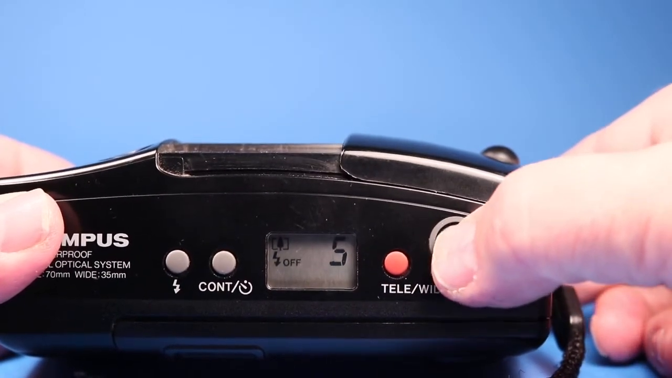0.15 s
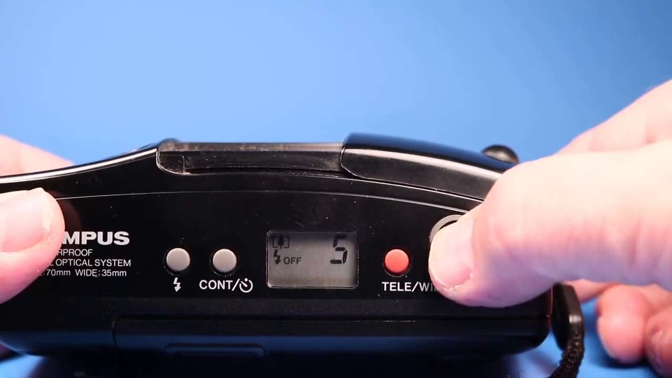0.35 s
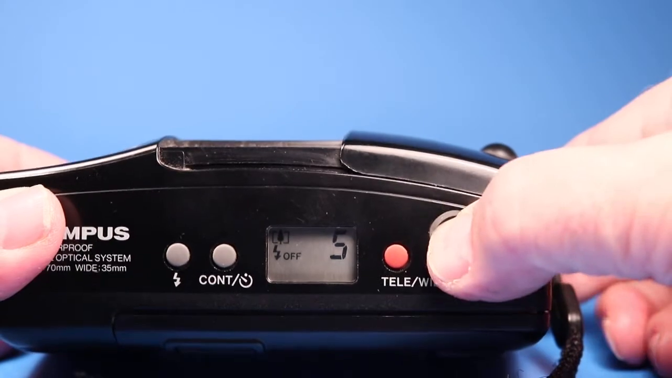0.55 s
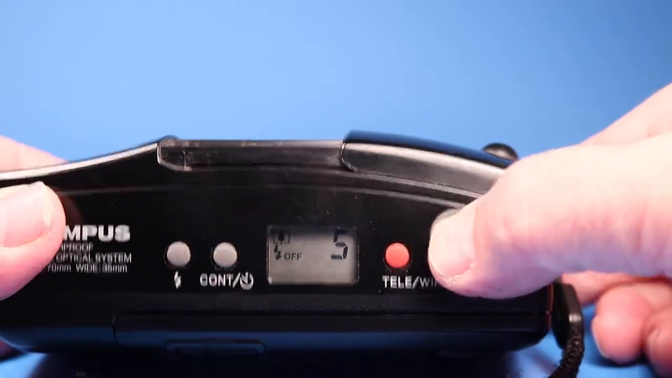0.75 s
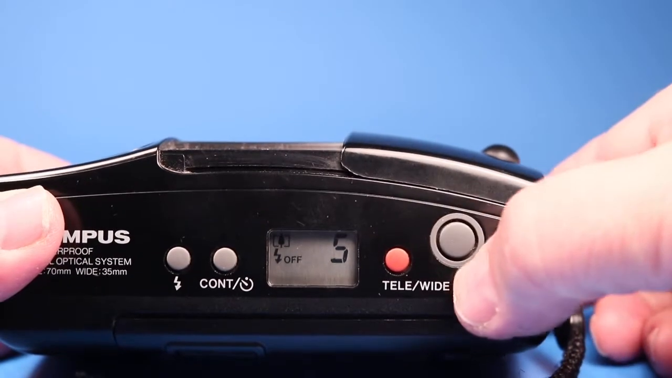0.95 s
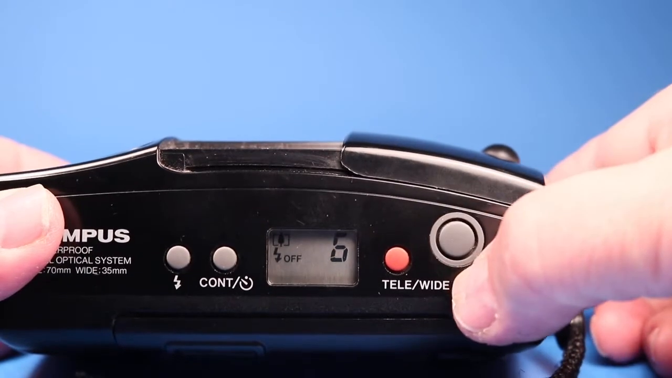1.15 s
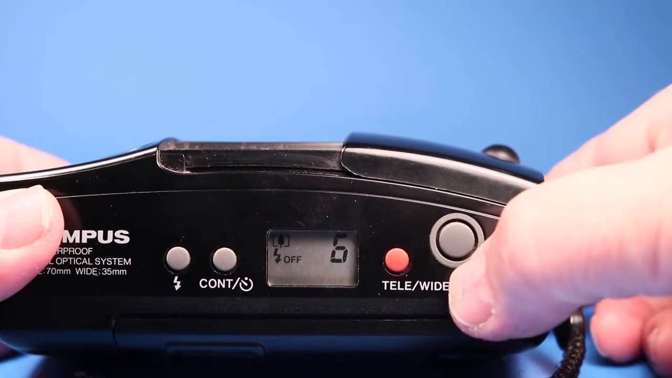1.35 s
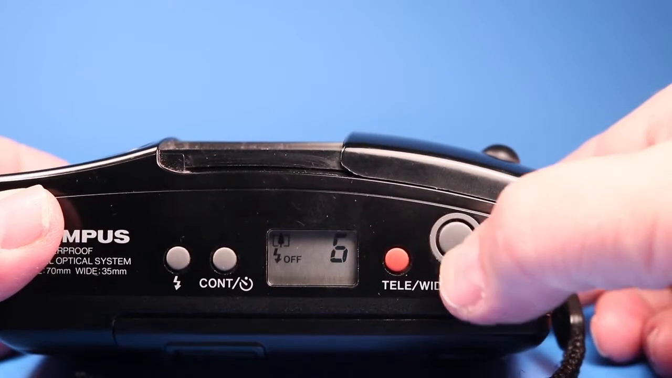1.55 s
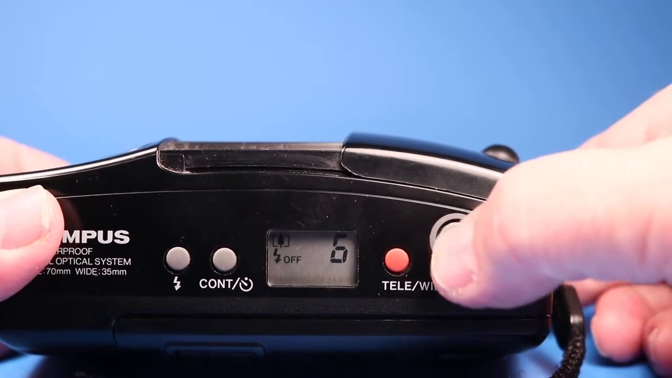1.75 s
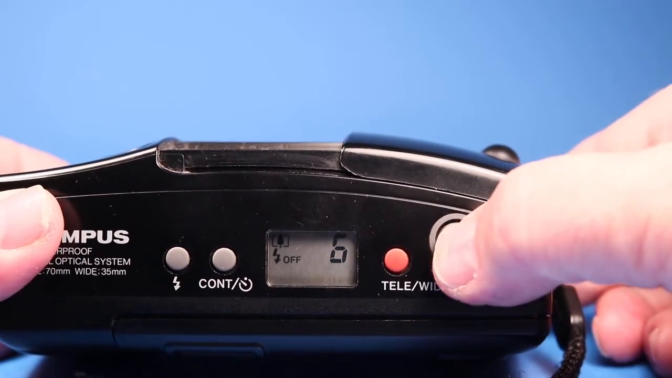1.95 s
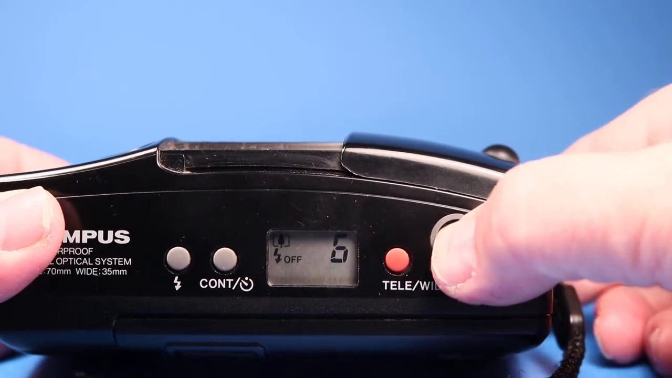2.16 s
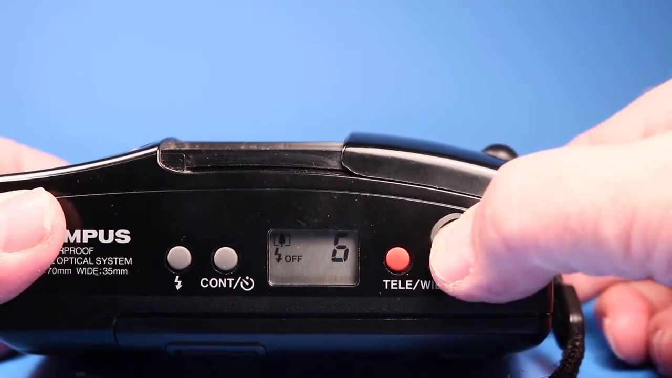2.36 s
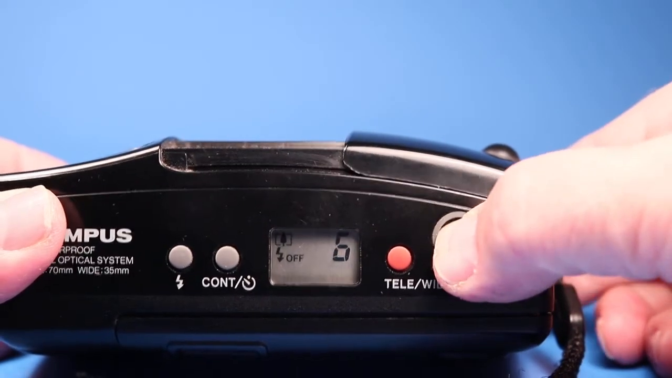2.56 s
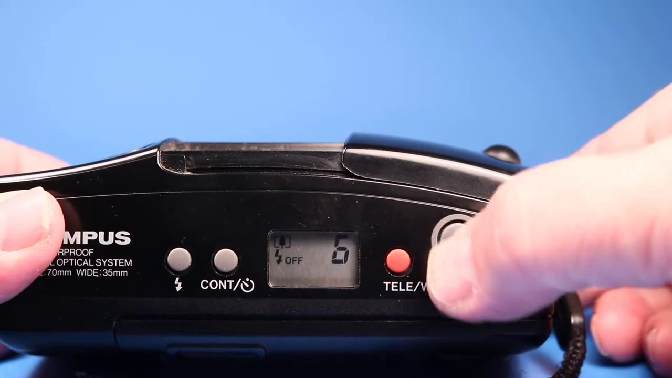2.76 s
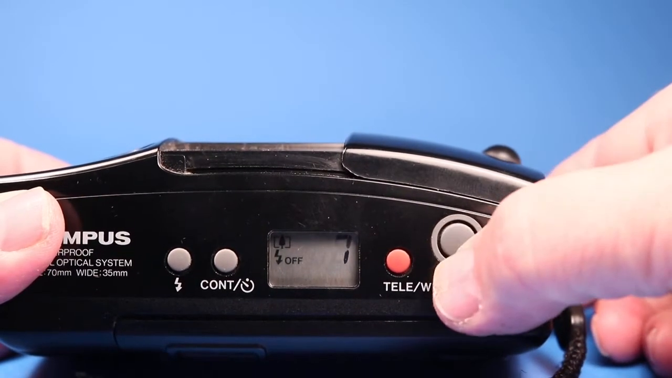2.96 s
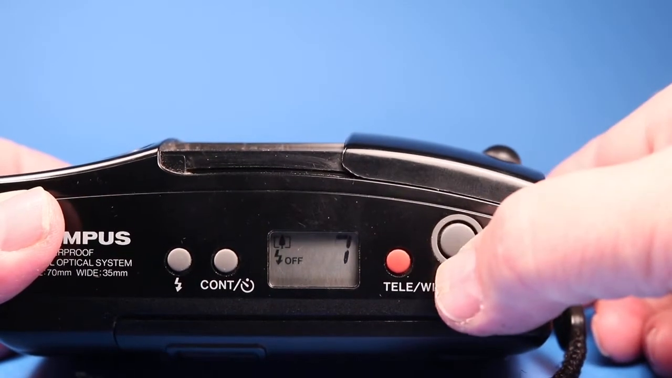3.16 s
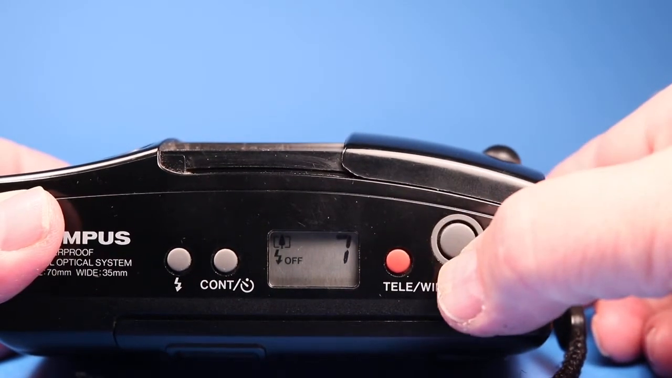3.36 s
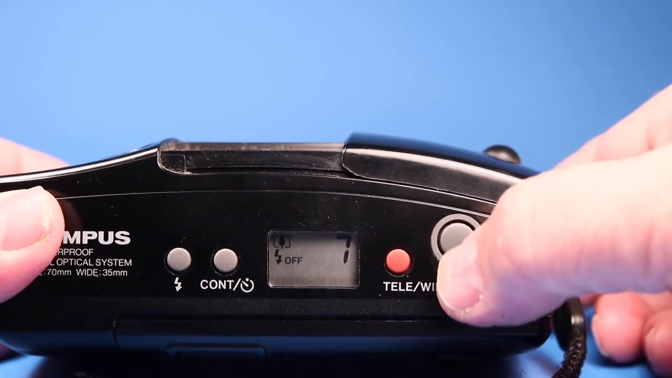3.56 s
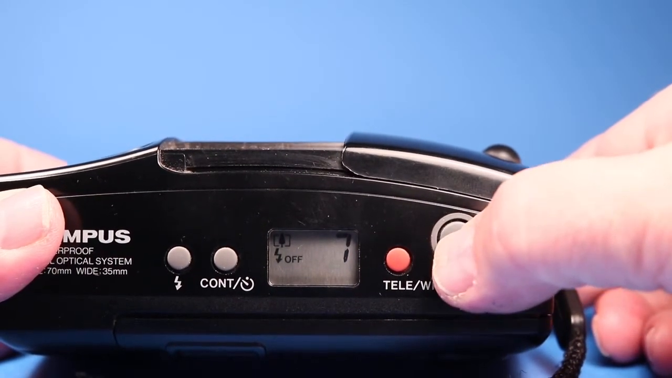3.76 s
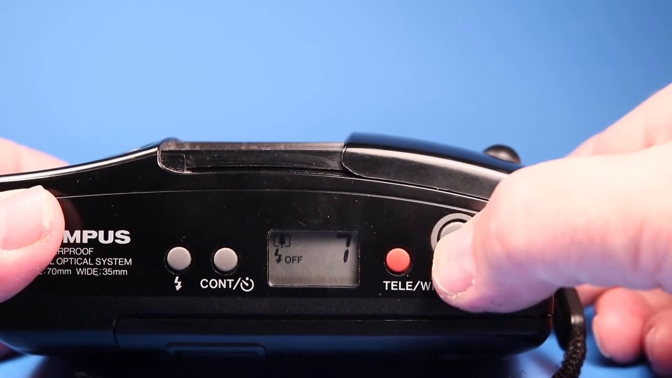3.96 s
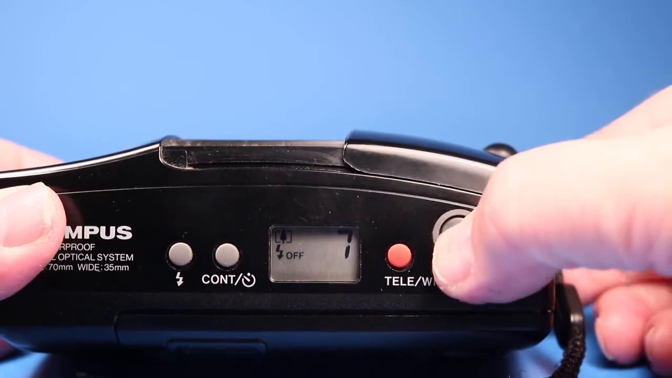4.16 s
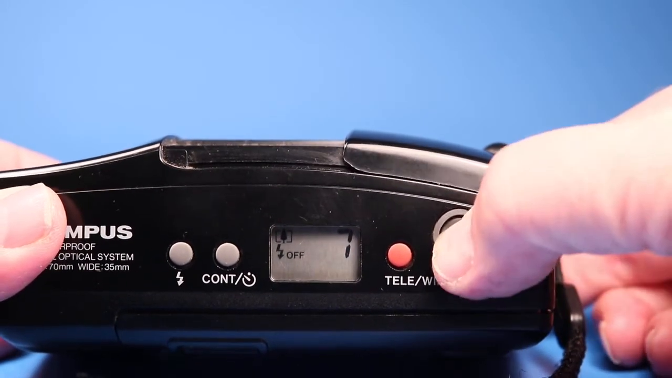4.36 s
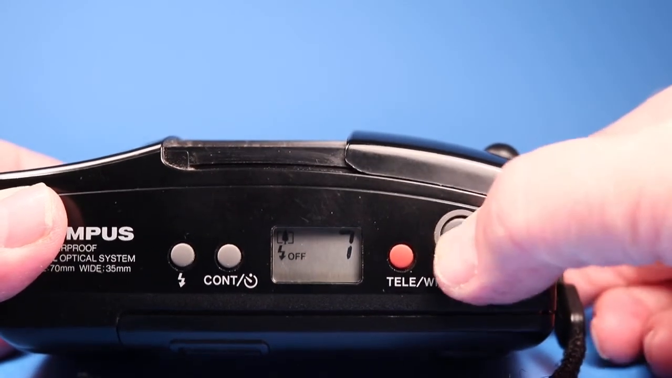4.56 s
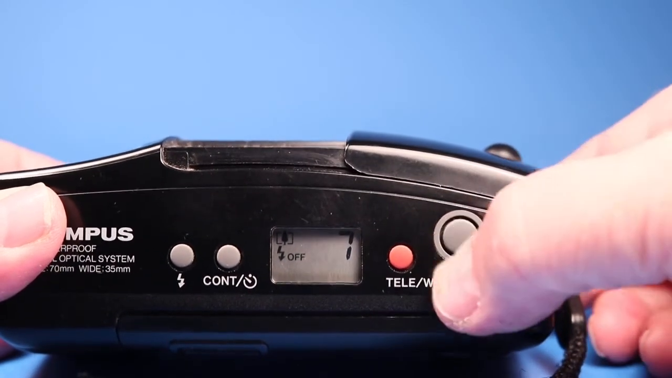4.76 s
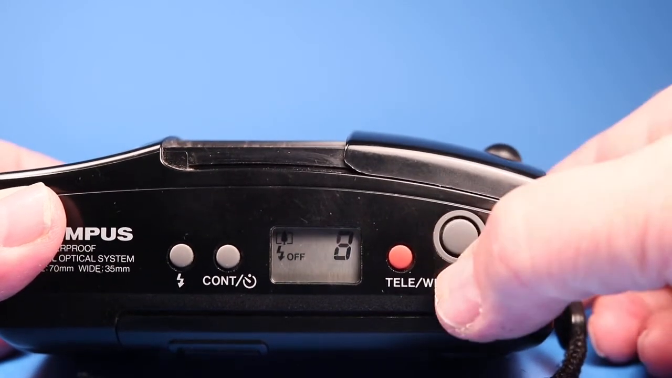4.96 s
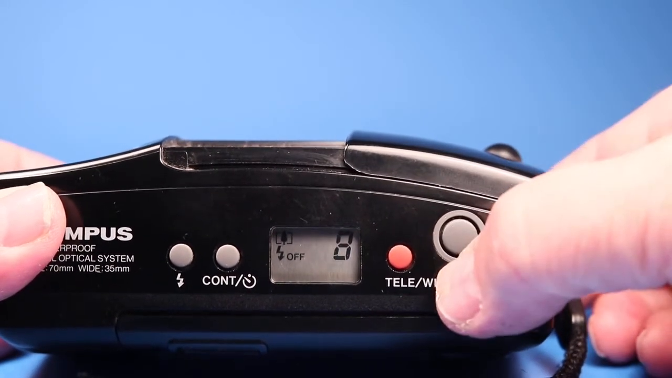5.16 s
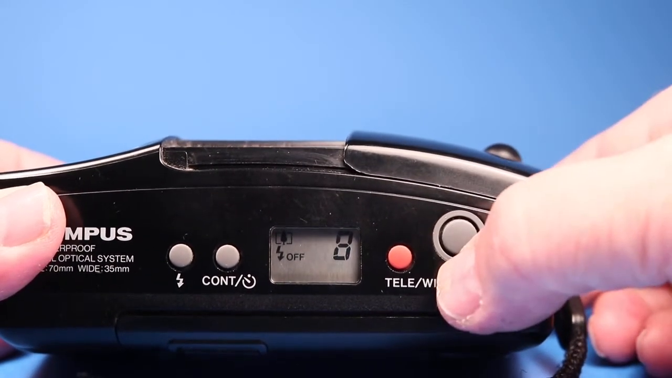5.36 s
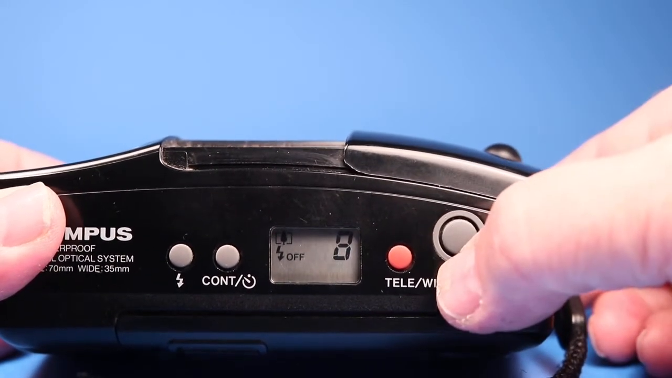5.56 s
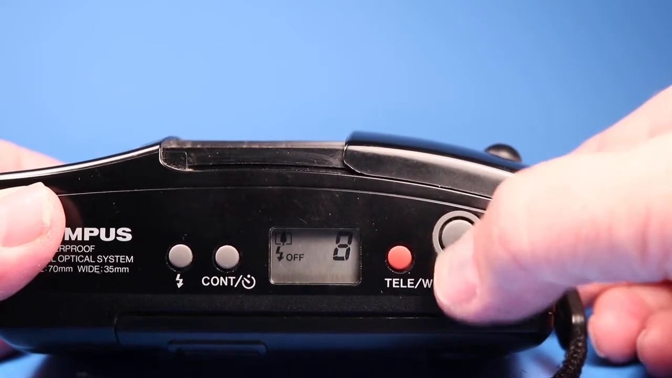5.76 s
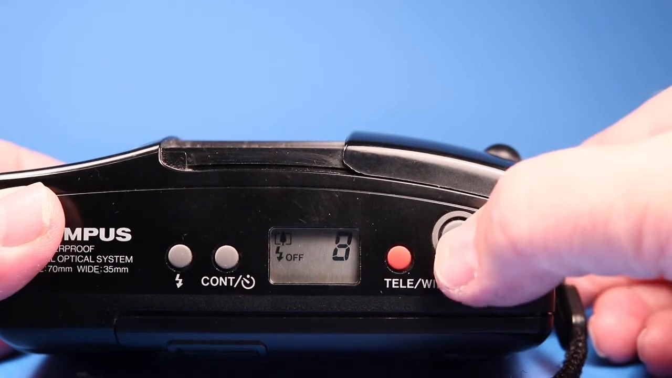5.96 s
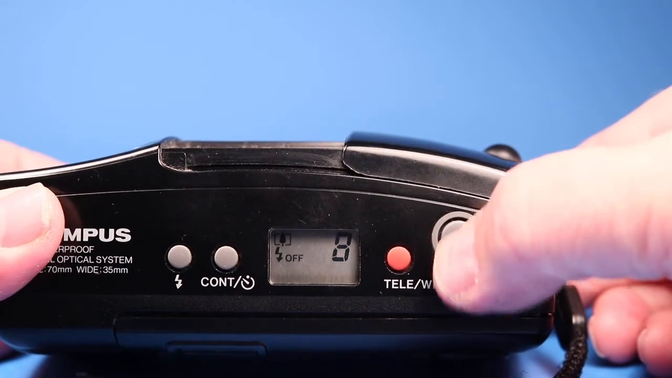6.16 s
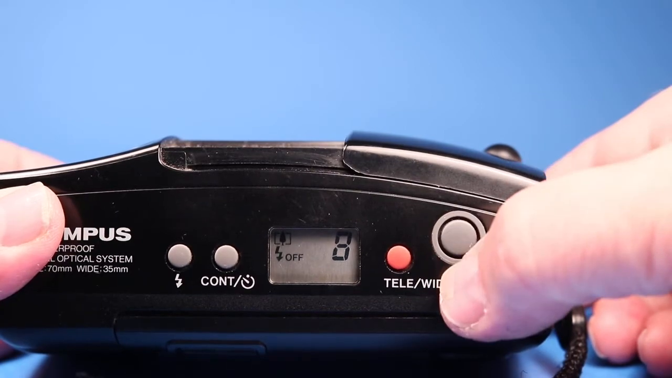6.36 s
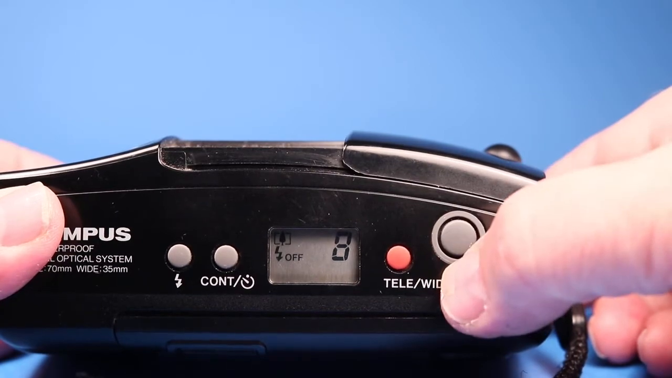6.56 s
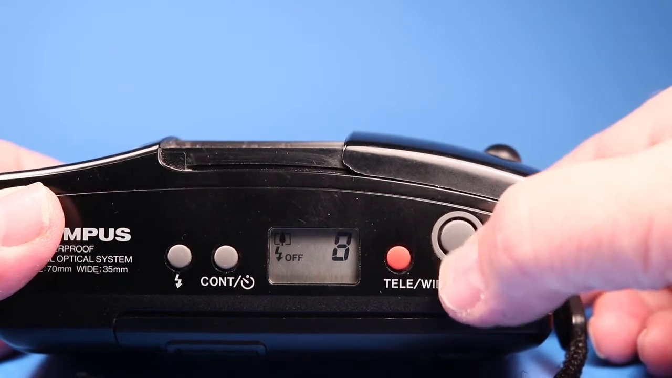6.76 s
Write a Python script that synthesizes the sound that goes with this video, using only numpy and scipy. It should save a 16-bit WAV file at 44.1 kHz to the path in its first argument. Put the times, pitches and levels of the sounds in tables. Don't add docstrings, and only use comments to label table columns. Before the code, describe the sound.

A compact film camera takes three pictures up close: rattly lens motor, hard shutter snap, then a higher whirring film wind, with quiet between.

```python
import sys
import numpy as np
from scipy import signal
from scipy.fft import rfft, irfft, next_fast_len
from scipy.io import wavfile

SR = 44100
rng = np.random.default_rng(int(sys.argv[2]) if len(sys.argv) > 2 else 0)


def invert_db(x):
    u = np.asarray(x, float) / 20
    return 10 ** u


def generate_wav(signal):
    frames = np.transpose(np.atleast_2d(signal))
    scaled = np.clip(frames, -1, 1) * 32767
    pcm = np.round(scaled).astype(np.int16)
    wavfile.write(sys.argv[1], SR, pcm)


N = 304157
TIME = np.arange(N) / SR
SIZE = next_fast_len(N + SR // 2)
BINS = np.maximum(np.arange(SIZE // 2 + 1) * SR / SIZE, 1)

LATCH_S = [
    1.158,
    2.978,
    4.968,
]
# start_s, peak_db
CONTACTS = [
    [(.6851, -6), (.7146, -6), (.7484, -13), (.8142, -5.5), (.8429, -5), (.8693, -10), (.9166, -6.5),
     (1.02, -6.5), (1.049, -18), (1.1233, -5), (1.1582, 2.5), (1.3681, -2), (1.5785, -3.5), (1.6434, -8)],
    [(2.498, -6), (2.5299, -7), (2.5694, -9), (2.6262, -7), (2.6579, -3), (2.6856, -10), (2.729, -7.5),
     (2.8358, -6.5), (2.8625, -6), (2.9365, -4), (2.9771, 5), (3.1826, -3.5), (3.4387, -4.5),
     (3.5032, -4.5)],
    [(4.4875, -6.5), (4.5194, -6), (4.5509, -5.5), (4.6163, -6), (4.6472, -4), (4.676, -13), (4.72, -6),
     (4.8276, -10), (4.8582, -6.5), (4.932, -5), (4.9684, 4.5), (5.171, -5.5), (5.43, -5.5), (5.4893, -17)],
]
# brightness_rel_db, thud_db, length_ms, left_minus_right_db
LEVERS = [(-14.5, -53, 5.7, -7), (-11, -58, 3.4, -9.5), (-21, -45, 3.1, -2), (-8.5, -35, 3.9, -7),
          (-15.5, -47, 2.76, -9), (-10.5, -54, 3.1, -4), (-7, -38.5, 6.5, -8), (-14.5, -54, 5, -9),
          (-19, -54, 2.7, -3.5), (-17, -28, 3.8, -8), (-11, -19.5, 7.1, -2), (-4.5, -47.5, 2.7, -9.5),
          (-9, -43, 3.6, -7.5), (-15.5, -42, 2.3, -9.5)]
# start_s, peak_db, brightness_rel_db, length_ms, left_minus_right_db
BUTTON = [
    (.2986, -42, 3, .7, -1.5),
    (2.1404, -45, 3, .7, -1),
    (4.1377, -35, -24, 1.4, -5),
    (4.1527, -36, 8, .6, -2),
    (4.163, -50, 3, 4, -2),
    (5.6016, -40, -22, 1.4, -1.5),
]
# freq_hz, width_hz, level_db
LEVER_RING = [(3000, 440, 5.5), (6340, 1800, 6.5)]

# time_s, shaft_hz, film_load_db
WIND = [
    [(1.19, 241.4, -27), (1.204, 247.7, -23), (1.27, 299.1, 0), (1.354, 319.2, -7), (1.426, 324.2, 2.5),
     (1.564, 331.7, -4), (1.59, 329.4, 0.5)],
    [(3.005, 200, -4), (3.05, 267.8, -5), (3.08, 288, -2), (3.136, 314.8, -6.5), (3.35, 330.4, 2),
     (3.434, 331.2, 1.5), (3.45, 334, -10)],
    [(4.995, 189.9, 1), (5.04, 257.4, -1), (5.082, 295.5, -3), (5.198, 317.3, -0.5), (5.326, 286.5, 8),
     (5.39, 259.8, 12.5), (5.44, 230.4, 6)],
]
# shaft_multiple, rel_db
HUM_ORDERS = [(2, -0.25), (3, -1)]
COMMUTATOR_ORDERS = [(4.55, -9.5), (5.3, -5)]
PINION_ORDERS = [(9, -3.5), (11, -9.5), (12.8, -12), (30, -12.5)]
FULL_SPEED_HZ, HUM_DB, HUM_DB_PER_HZ, HUM_LEAST_DB = 330, -37.5, .3, -56
TAKE_UP_S, SLACK_DB = .09, 26
COMMUTATOR_DB, COMMUTATOR_KNEE_HZ, COMMUTATOR_DB_PER_HZ = -27, 300, .4
PINION_DB, OCTAVE_DB, OCTAVE_LOAD_SHARE, OCTAVE_DB_PER_HZ = -30, -28.5, .25, .09
BOOM_LO_HZ, BOOM_HI_HZ, BOOM_TOP_DB, BOOM_LO_DB_PER_HZ, BOOM_HI_DB_PER_HZ = 630, 860, -38.5, .09, .04

# start_s, trip_s, end_s, tooth_load_db
LENS_RUNS = [
    (-.60, -.478, -.35, -0.11),
    (-.345, -.14, .019, -1.5),
]
# shaft_multiple, rel_db
LENS_ORDERS = [(30, -1), (40, 5.5), (50, -3)]
BRAKED_HZ, CRUISE_HZ, CREEP_HZ, SURGE_HZ = 102.6, 127.8, 3, 141.2
SPIN_UP_S, SURGE_S, BRAKE_S = .055, .024, .072
LENS_HUM_DB, LENS_TOOTH_DB, LENS_FREE_DB, LENS_BRAKED_DB = -48, -30.5, -62, -41
TOOTH_KNEE_HZ, TOOTH_DB_PER_HZ, TOOTH_SWELL_DB = 119, 1.2, 3.2

# time_from_latch_s, level_db
TRAIN = [(-0.608, -63), (-0.591, -35), (-0.57, -27), (-0.48, -24), (-0.26, -22.5), (-.10, -23),
         (0.0077, -19.5), (.12, -20.5), (.24, -18.5)]
# stop_s, last_effort_db
STOPS = [
    (1.655, -20.5),
    (3.515, -20.5),
    (5.494, -24.5),
]
EASE_S, EASE_DB, RUN_DOWN_S, RUN_DOWN_DB = 0.032, 1, 0.066, 31
# start_s, length_s, boom_db, buzz_db
DRIVE = [(0.753, .075, -34, -37.5), (1.068, 0.14, -32.5, -40), (1.601, 0.052, -40, -45),
         (2.56, 0.076, -32.5, -35.5), (2.893, 0.13, -29.5, -33), (3.461, .06, -39, -42.5),
         (4.542, 0.08, -34, -38.5), (4.884, 0.14, -32, -38), (5.437, 0.036, -40.5, -54)]
DRIVE_ATTACK_S, DRIVE_RELEASE_S = .012, .02
TICKS_PER_S, TICK_SPREAD_DB, SHAFT_THROB = 8000, 2.4, .3
EFFORT_REF_DB = -22
BOOM_DB, BOOM_FOLLOWS, FIZZ_DB, FIZZ_FOLLOWS = -39, 0.6, -34.5, 0.89
SPRING_HZ, SPRING_T60_S, SPRING_DB, SPRING_HELD_S = 2565, .75, -70, 4.2
# freq_hz, level_db_per_hz
SHELL = [(210, -47.5), (350, -6.5), (404, -26.5), (655, -9), (903, -14.5), (1530, -3.5), (2080, -5),
         (2610, -4.5), (5280, -17.5), (6300, -9.5), (6940, -14), (8550, -11), (13800, -25), (16200, -19)]
# freq_hz, width_hz, level_db
SHELL_PEAKS = [(670, 110, 4), (1330, 120, 2), (1580, 350, 2), (2580, 140, 3), (2880, 160, 2),
               (4150, 600, 6), (7660, 300, 2), (8600, 300, 2)]
# freq_hz, left_right_likeness
RATTLE_ALIKE = [(300, 1), (900, 1), (1500, 0.88), (3000, 0.48), (7000, 0.049), (15000, 0.099)]

# start_s, peak_db
THUNKS = [(0.749, -14.5), (1.08, -20), (1.157, -15.5), (1.644, -38), (2.565, -16.5), (2.901, -20.5),
          (2.977, -15.5), (3.502, -26), (4.552, -17.5), (4.884, -25), (4.967, -15.5), (5.489, -33)]
# start_s, peak_db, freq_hz
HANDS = [
    (0.11, -45, 114),
    (0.409, -44, 110),
    (2.202, -42, 137),
    (4.178, -42.5, 124),
]
RUB_START_S, RUB_LENGTH_S, RUB_DB, RUB_HZ = 5.70, .11, -57, 1400

# freq_hz, left_minus_right_db
SIDES = [(100, 2.5), (300, -3.4), (1300, 0.8), (2400, -7.5), (4400, -2.5), (8000, -1.7), (15000, 2.5)]
TABLE_T60_S, TABLE_DB = .004, -8
ROOM_T60_S, ROOM_DB = .2, -15
# freq_hz, level_db_per_hz
AIR = [(12, -64), (20, -24), (53, -8.5), (150, -8.5), (270, -8), (350, -7), (450, -12.5), (700, -13.5),
       (1300, -17), (2500, -21), (8000, -27), (12000, -31), (15500, -35), (17000, -43.5)]
# freq_hz, width_hz, level_db
AIR_HUM = [(59, 4.1, 9.5), (119, 7.4, 4.5), (245, 5.1, 11)]
# freq_hz, left_right_likeness
AIR_ALIKE = [(60, 0.53), (240, 0.63), (950, 0.11), (3770, 0.21), (15000, 0.037)]
AIR_DB = -57

LIMIT_DB, RELEASE_DB_PER_S, ATTACK_S = -6, 139.5, 0.0094


def clicks():
    span_s = np.arange(int(.03 * SR)) / SR
    rows = contact_rows()
    length_ms = np.maximum(rows[:, 4:5], .3)
    fades = np.minimum(span_s / .0009, 1) * np.exp(-(span_s * 1000 / length_ms) ** 3)
    impulse = 1.0 * (np.arange(N) == 0)
    ring = causal(shell(impulse), humps(LEVER_RING))[None, :len(span_s)]
    ring = ring * invert_db(-60 * span_s / 0.022)
    contacts = rng.standard_normal(fades.shape) * fades
    struck = signal.fftconvolve(contacts, ring, axes=1)[:, :len(span_s)]
    mids = band(struck, 2, 950, 5000)
    highs = band(struck, 2, 4200, 12500)
    out, thud = np.zeros((2, 2, N))
    for (start_s, peak_db, bright_db, thud_db, _, pan_db), mid, high in zip(rows, mids, highs):
        at = round(start_s * SR)
        sides = invert_db([[pan_db / 2 + 2.5], [-pan_db / 2 - 2.5]])
        flurry = mid / np.abs(mid).max() + invert_db(bright_db + 8.0) * high / np.abs(high).max()
        out[:, at:at + len(span_s)] += invert_db(peak_db - 0.3) * flurry * sides
        thud[:, at] += invert_db(thud_db - 1.0)
    return out + knock(thud, 195, .16) + invert_db(-4.5) * knock(thud, 150, 0.16)


def contact_rows():
    levers = [hit + lever for cycle in CONTACTS for hit, lever in zip(cycle, LEVERS)]
    button = [(s, db, bright_db, -99, ms, pan_db) for s, db, bright_db, ms, pan_db in BUTTON]
    return np.array(levers + button)


def winding_motor():
    gate, hz, load_db = in_time(WIND)
    turns = np.cumsum(hz) / SR
    lag_hz = FULL_SPEED_HZ - hz
    taken_up = sum(held(run[0][0], 1, TAKE_UP_S, .1) for run in WIND)
    slack_db = SLACK_DB * (1 - taken_up)

    hum_db = np.maximum(HUM_DB - HUM_DB_PER_HZ * lag_hz, HUM_LEAST_DB)
    hum = whine(turns, 1, hum_db, flutter_db=.7, blur=.1)
    for k, db in HUM_ORDERS:
        hum += whine(turns, k, booming(k * hz) + db, flutter_db=.7 * k, blur=.1 * k)

    below_knee_hz = np.maximum(COMMUTATOR_KNEE_HZ - hz, 0)
    commutator_db = COMMUTATOR_DB - slack_db - COMMUTATOR_DB_PER_HZ * below_knee_hz
    commutator = sum(whine(turns, k, commutator_db + db + 2, flutter_db=3.0, blur=.7)
                     for k, db in [(5, 0)] + COMMUTATOR_ORDERS)

    pinion_db = PINION_DB + load_db
    pinion = whine(turns, 10, pinion_db + 1, flutter_db=1.6, blur=.4)
    side_db = np.minimum(pinion_db, PINION_DB)
    pinion += sum(whine(turns, k, side_db + db + 1, flutter_db=2.5, blur=.6) for k, db in PINION_ORDERS)

    octave_db = OCTAVE_DB - slack_db + OCTAVE_LOAD_SHARE * load_db - OCTAVE_DB_PER_HZ * lag_hz
    octave = whine(turns, 20, octave_db, flutter_db=3.0, blur=.8)
    return gate * (hum + commutator + pinion + octave), gate * np.cos(2 * np.pi * turns)


def booming(hz):
    below_db = BOOM_LO_DB_PER_HZ * np.maximum(BOOM_LO_HZ - hz, 0)
    above_db = BOOM_HI_DB_PER_HZ * np.maximum(hz - BOOM_HI_HZ, 0)
    return BOOM_TOP_DB - below_db - above_db


def lens_motor():
    cycle = []
    for start, trip, end, db in LENS_RUNS:
        cycle += [(start, BRAKED_HZ, db), (start + SPIN_UP_S, CRUISE_HZ, db),
                  (trip, CRUISE_HZ + CREEP_HZ, db), (trip + SURGE_S, SURGE_HZ, db),
                  (trip + SURGE_S + BRAKE_S, BRAKED_HZ, db), (end, BRAKED_HZ, db)]
    gate, hz, load_db = in_time([np.array(cycle) + [s, 0, 0] for s in LATCH_S])
    turns = np.cumsum(hz) / SR
    braked = sum(held(latch + trip + SURGE_S, end - trip - SURGE_S - .015, .04, .015)
                 for latch in LATCH_S for start, trip, end, db in LENS_RUNS)
    load_db = load_db - TOOTH_DB_PER_HZ * np.maximum(TOOTH_KNEE_HZ - hz, 0)
    load_db = load_db + 6 * braked + TOOTH_SWELL_DB * drift(14)
    high_db = LENS_FREE_DB + braked * (LENS_BRAKED_DB - LENS_FREE_DB)
    teeth = whine(turns, 20, LENS_TOOTH_DB + load_db, flutter_db=3.5, blur=.7)
    teeth += sum(whine(turns, k, high_db + db, flutter_db=2.2, blur=.7) for k, db in LENS_ORDERS)
    hum = whine(turns, 1, LENS_HUM_DB, flutter_db=4.0, blur=0.08)
    rise = sum(held(latch + LENS_RUNS[0][0], 0.7, 0.076, .01) for latch in LATCH_S)
    return gate * rise * (hum + teeth), gate * np.cos(2 * np.pi * turns)


def gear_rattle(shaft):
    gate, effort_db = train_effort()
    engaged = [held(s, length, DRIVE_ATTACK_S, DRIVE_RELEASE_S) for s, length, *_ in DRIVE]
    drive_boom = sum(on * invert_db(row[2]) for on, row in zip(engaged, DRIVE))
    drive_buzz = sum(on * invert_db(row[3]) for on, row in zip(engaged, DRIVE))
    boom = invert_db(BOOM_DB + BOOM_FOLLOWS * (effort_db - EFFORT_REF_DB)) + drive_boom
    fizz_db = FIZZ_DB + FIZZ_FOLLOWS * (effort_db - EFFORT_REF_DB)

    sizes = invert_db(TICK_SPREAD_DB * np.minimum(rng.exponential(1, (2, N)), 3)) * rng.choice([-1, 1], (2, N))
    ticks = sizes * (rng.random((2, N)) < TICKS_PER_S / SR)
    ticks = ticks * (1 + SHAFT_THROB * shaft) * invert_db(1.2 * drift(50))
    body = two_ears(shell(ticks), RATTLE_ALIKE)
    rattle = invert_db(effort_db - 1) * zone(body, 1000, 5000)
    rattle = rattle + boom * zone(body, 470, 1000)
    rattle = gate * (rattle + invert_db(fizz_db + 1) * zone(body, 5000, 16500))

    buzz = np.sqrt(2) * np.sin(2 * np.pi * 197 * TIME + 0.6 * drift(31)) * drive_buzz
    spring = invert_db(SPRING_DB) * knock(rattle * (TIME < SPRING_HELD_S), SPRING_HZ, SPRING_T60_S)
    return rattle + buzz + spring


def train_effort():
    spans = []
    for latch, (stop, last_db) in zip(LATCH_S, STOPS):
        span = [(latch + s, db) for s, db in TRAIN]
        span += [(stop - EASE_S, last_db + EASE_DB), (stop, last_db)]
        spans.append(span + [(stop + RUN_DOWN_S, last_db - RUN_DOWN_DB)])
    return in_time(spans)


def thunks():
    blows = np.zeros(N)
    blows[[round(s * SR) for s, db in THUNKS]] = invert_db(np.array(THUNKS)[:, 1] - 3.5)
    return knock(blows, 680, .07) + invert_db(-2.5) * knock(blows, 901, 0.032)


def hands():
    skin = zone(rng.standard_normal(N), RUB_HZ / 1.2, RUB_HZ * 1.21)
    out = invert_db(RUB_DB) * held(RUB_START_S, RUB_LENGTH_S, RUB_LENGTH_S / 2, RUB_LENGTH_S / 2) * skin
    for start_s, peak_db, hz in HANDS:
        out += knock(invert_db(peak_db) * (np.arange(N) == round(start_s * SR)), hz, 0.08)
    return out


def echoes(x, t60_s, gap_s, lo_hz):
    t = np.arange(int(.4 * SR)) / SR
    cloud = rng.standard_normal((2, len(t))) * invert_db(-60 * t / t60_s) * (t > gap_s)
    cloud = signal.sosfilt(signal.butter(2, lo_hz, "high", fs=SR, output="sos"), cloud)
    cloud = cloud / np.sqrt(np.sum(cloud ** 2, axis=1, keepdims=True))
    return signal.fftconvolve(x, cloud, axes=1)[:, :N]


def air():
    hiss = causal(rng.standard_normal((2, SIZE)), on_bins(AIR) + humps(AIR_HUM))
    return invert_db(AIR_DB + 3.5) * rms_one(two_ears(hiss, AIR_ALIKE))


def whine(turns, multiple, level_db, flutter_db, blur):
    level = np.sqrt(2) * invert_db(level_db + flutter_db * drift(90))
    return level * np.sin(2 * np.pi * multiple * turns + blur * drift(34))


def knock(x, hz, t60_s):
    r, w = invert_db(-60 / (t60_s * SR)), 2 * np.pi * hz / SR
    return signal.lfilter([0, np.sin(w)], [1, -2 * r * np.cos(w), r * r], x + 1e-18)


def shell(x):
    return causal(x, on_bins(SHELL) + humps(SHELL_PEAKS))


def causal(x, db):
    fold = irfft(db * np.log(10) / 20, SIZE)
    fold[1:SIZE // 2] *= 2
    fold[SIZE // 2 + 1:] = 0
    return irfft(rfft(x, SIZE) * np.exp(rfft(fold)), SIZE)[..., :N]


def humps(peaks):
    return sum(db / (1 + (2 * (BINS - hz) / width) ** 2) for hz, width, db in peaks)


def on_bins(points):
    hz, value = np.transpose(points)
    return np.interp(np.log(BINS), np.log(np.maximum(hz, 1)), value)


def two_ears(pair, likeness):
    mid, side = rfft(pair, SIZE)
    alike = np.clip(on_bins(likeness), 0, 1)
    opposed = np.sqrt(1 - alike) * side * np.array([[1], [-1]])
    return irfft(np.sqrt(1 + alike) * mid + opposed, SIZE)[:, :N]


def in_time(tables):
    s, *columns = np.transpose(np.concatenate(tables))
    gate = sum(np.interp(TIME, [t[0][0] - .01, t[0][0], t[-1][0], t[-1][0] + 0.022], [0, 1, 1, 0])
               for t in tables)
    return [gate] + [np.interp(TIME, s, c) for c in columns]


def held(start_s, length_s, attack_s, release_s):
    rise = (TIME - start_s) / attack_s
    fall = 1 + (start_s + length_s - TIME) / release_s
    return np.clip(np.minimum(rise, fall), 0, 1)


def drift(rate_hz):
    r = np.exp(-2 * np.pi * rate_hz / SR)
    return rms_one(signal.lfilter([1], [1, -2 * r, r * r], rng.standard_normal(N + SR))[SR:])


def band(x, order, lo_hz, hi_hz):
    return signal.sosfilt(signal.butter(order, [lo_hz, hi_hz], "band", fs=SR, output="sos"), x)


def zone(x, lo_hz, hi_hz):
    return rms_one(band(x, 3, lo_hz, hi_hz))


def rms_one(x):
    return x / np.sqrt(np.mean(x ** 2) + 1e-20)


def scene():
    lens, lens_shaft = lens_motor()
    wind, wind_shaft = winding_motor()
    camera = lens + wind + gear_rattle(lens_shaft + wind_shaft) + clicks() + thunks() + hands()
    camera = signal.sosfilt(signal.butter(3, 85, "high", fs=SR, output="sos"), camera)
    camera = np.array([causal(ear, sign * on_bins(SIDES) / 2) for ear, sign in zip(camera, (1, -1))])
    camera[0] = np.roll(camera[0], 3)
    near = camera + invert_db(TABLE_DB) * echoes(camera, TABLE_T60_S, gap_s=.0003, lo_hz=2200)
    return near + invert_db(ROOM_DB) * echoes(camera, ROOM_T60_S, gap_s=.004, lo_hz=300) + air()


def roll_off(x):
    return signal.sosfilt(signal.butter(12, 16400, fs=SR, output="sos"), x)


def record(dry):
    level_db = 20 * np.log10(np.max(np.abs(dry), axis=0) + 1e-9)
    over_db = np.maximum(level_db - LIMIT_DB, 0)
    release_db = RELEASE_DB_PER_S * TIME
    peak_db = np.maximum.accumulate(over_db + release_db) - release_db
    r = np.exp(-1 / (ATTACK_S * SR))
    duck_db = signal.lfilter([1 - r], [1, -r], peak_db)
    limited = np.clip(dry * invert_db(-duck_db), -1, 1)
    mix = signal.sosfilt(signal.cheby2(12, 70, 16700, fs=SR, output="sos"), limited)
    return roll_off(mix)


dry = scene()
out = record(dry)
generate_wav(out)
```